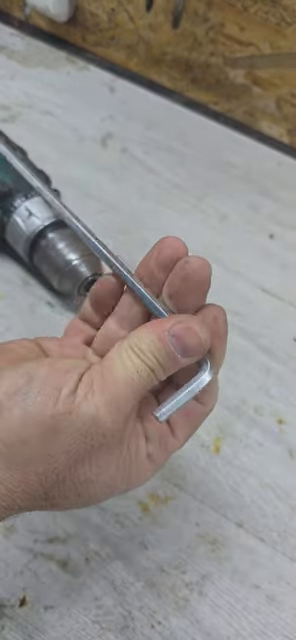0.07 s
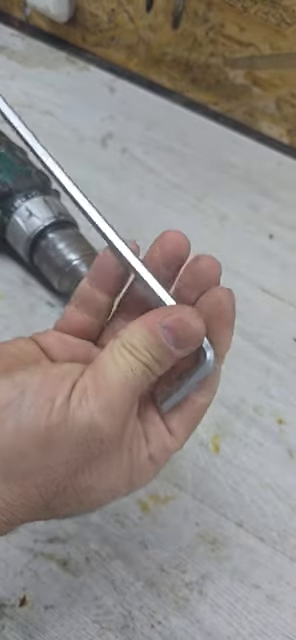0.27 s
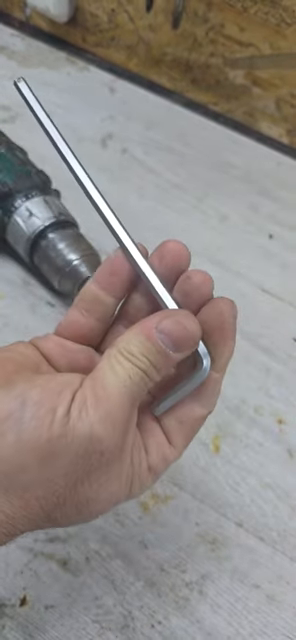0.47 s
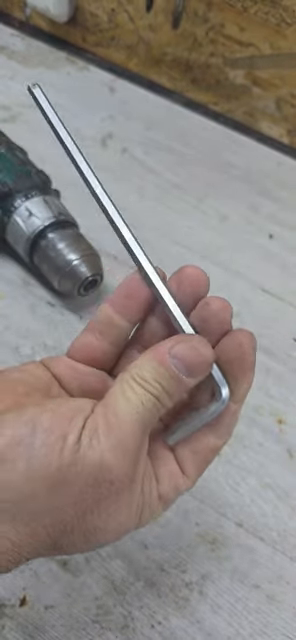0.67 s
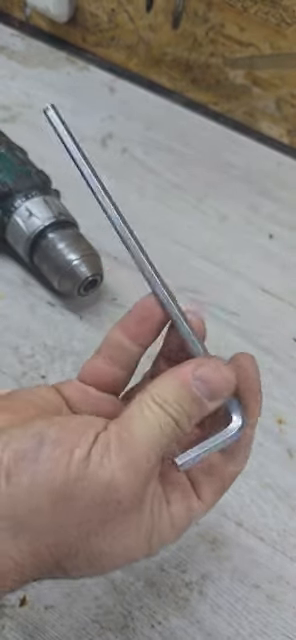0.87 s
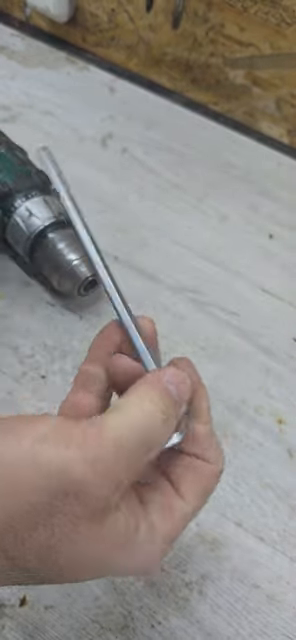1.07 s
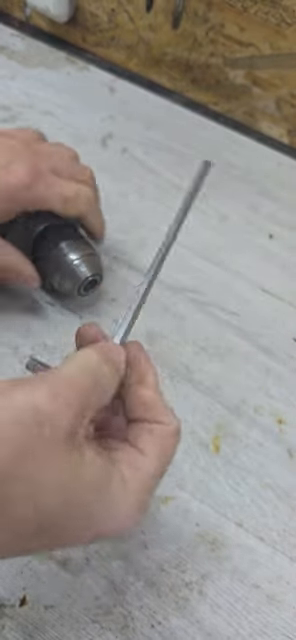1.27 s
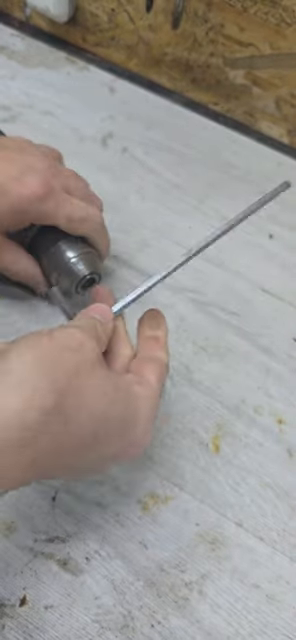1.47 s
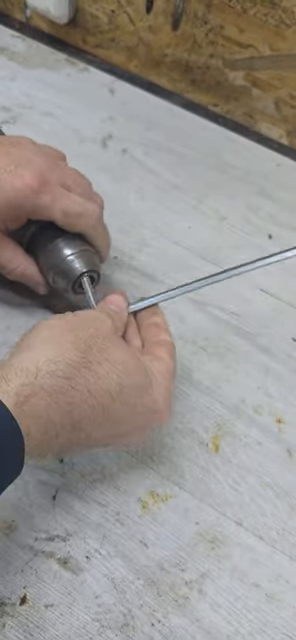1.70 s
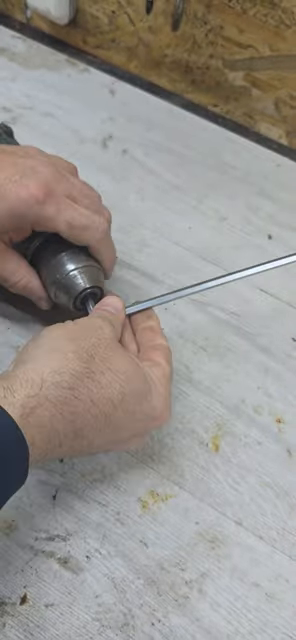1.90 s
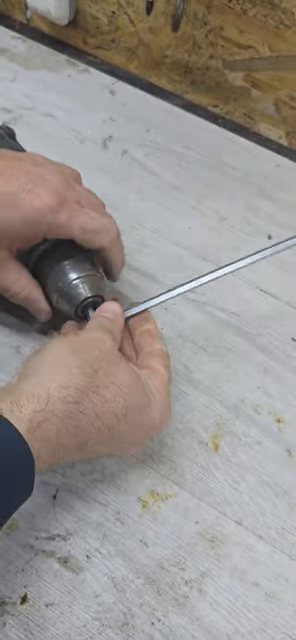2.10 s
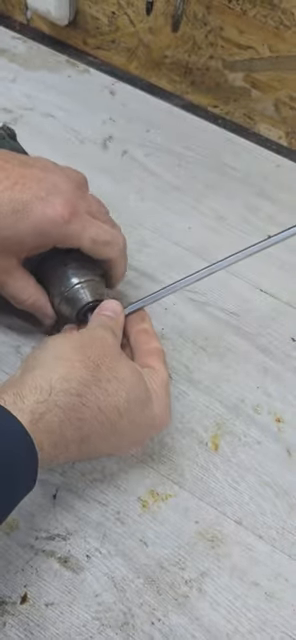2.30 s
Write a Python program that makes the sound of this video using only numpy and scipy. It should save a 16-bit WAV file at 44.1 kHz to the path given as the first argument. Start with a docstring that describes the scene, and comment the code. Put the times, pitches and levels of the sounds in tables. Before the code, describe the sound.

A drill knocks and thumps down on a wooden workbench, then a hex key ticks faintly.

```python
"""A cordless drill is set down on a wooden workbench: its plastic housing knocks, its weight thumps
the top and its loose chuck rattles. A steel hex key chinks and ticks against the chuck.
A hand shifts the drill and a sleeve brushes past, making rubbing noise; there are two short squeaks.
The knocks, thumps and clicks set the parts ringing. Small quiet workshop, close stereo microphone."""
import sys
import numpy as np
from scipy import signal
from scipy.fft import rfft, irfft
from scipy.io import wavfile

SR = 44100
rng = np.random.default_rng(int(sys.argv[2]) if len(sys.argv) > 2 else 0)


def bounce(signal):
    """Save signal as a 16-bit WAV file at the path given by the first command-line argument."""
    frames = np.transpose(np.atleast_2d(signal))
    limited = np.clip(frames, -1, 1)
    pcm = np.round(limited * 32767).astype(np.int16)
    wavfile.write(sys.argv[1], SR, pcm)


N = 108045

# The housing hits the bench (more tilt is brighter): start_s, level_db, tilt_db_per_octave
HOUSING_KNOCKS = [(.2478, -12.5, 0), (.2525, -18, -1), (.2745, -26, -2), (.279, -31, -4.5),
                  (.3757, -26.5, 1), (.4887, -21, -0.5), (.4907, -17, -0.5), (1.4365, -49.5, 2.5),
                  (1.576, -50.5, -1.5), (1.642, -52.5, 6)]
# A knock's colour, or how strong its lows and highs are: frequency_hz, level_db
KNOCK_COLOUR = [(50, -40), (140, -8.5), (520, 1), (1050, -7), (1550, 0), (3000, -4), (4500, -11),
                (7000, -20), (15000, -30.5)]
# The housing's ringing tones (ring_s is the time to fade by 60 dB): pitch_hz, level_db, ring_s
HOUSING_TONES = [(410, -8, .06), (571, -3, .125), (605, -7, .09), (1325, -12, .09), (1500, -6, .075),
                 (1585, -3, .075), (1760, -10, .085), (1935, -14, .14), (2148, -8, .13), (2740, -9, .11),
                 (3050, -11, .1)]
def housing():
    """Hard plastic knocks on wood and rings briefly."""
    knocks = blows(HOUSING_KNOCKS, KNOCK_COLOUR, scatter_db=8.5, scatter_s=.0025)
    ringing = resound(knocks, HOUSING_TONES, ring_db=-15)
    return pan(room(ringing, wall_db=-13.5, room_db=-9, lead_s=.00015), left_db=1)


# The drill's weight lands on the bench top: centre_s, level_db, pitch_hz
BENCH_THUMPS = [(0.2493, -28.5, 192), (0.3645, -19.5, 261), (.45, -3.5, 331), (.465, -16, 148.8),
                (0.4765, -17.5, 330), (0.492, -13, 410), (0.515, -22, 281), (1.388, -43, 126),
                (1.448, -41, 77), (1.536, -37.5, 107.7), (1.647, -48, 79), (1.75, -39, 143),
                (1.926, -43.5, 165.3), (2.048, -46.5, 113.5), (2.095, -55.5, 189.6), (2.336, -54, 368),
                (2.381, -35, 115.4)]
# The top's ringing tones: pitch_hz, level_db, ring_s
BENCH_TONES = [(66, -19.5, .42), (127, -19, .3), (179.6, -24.5, 0.26), (341, -21.5, .22),
               (456, -22.5, 0.13)]
def bench():
    """Each thump is one push and rebound of the top, which then booms. The drill's judder joins in."""
    thumps, t = np.zeros((1, N)), np.arange(N) / SR
    for centre_s, level_db, pitch_hz in BENCH_THUMPS:
        spread = (np.pi * pitch_hz * (t - centre_s)) ** 2
        thumps += amp(level_db) * (1 - 2 * spread) * np.exp(-spread)
    boom = resound(thumps, BENCH_TONES, ring_db=-22)
    return pan(room(boom, wall_db=-17.5, room_db=-7.5, lead_s=0) + judder(), left_db=-1.5)


def judder(start_s=.455, pitch_hz=68.1, level_db=-21, ring_s=.49, count=6):
    """The landed drill rocks quickly on its feet; higher multiples of the pitch die first."""
    t = np.maximum(np.arange(N) / SR - start_s, 0)
    multiple, phase = np.arange(1, count + 1)[:, None], rng.random((count, 1))
    fade = amp(-60 * t * multiple ** .38 / ring_s)
    tones = fade * np.sin(2 * np.pi * (multiple * pitch_hz * t + phase))
    rise = 1 - np.exp(-t / .0084)
    return amp(level_db) * rise * tones.sum(0) / np.sqrt(2)


# The loose chuck clacks: start_s, level_db, tilt_db_per_octave
CHUCK_RATTLES = [(.338, -29, 0.5), (.359, -37, -1), (.3765, -38.5, 6.5), (.452, -16.5, -1), (.458, -23, -4),
                 (.502, -30.5, -3), (.5135, -33, 1), (.5318, -25.5, 0.5), (.565, -35.5, 1)]
# A clack's colour: frequency_hz, level_db
RATTLE_COLOUR = [(200, -9.5), (1200, -3.5), (2500, -12.5), (3600, -4), (6000, -5), (8000, -5.5),
                 (9700, -8.5), (12000, -4.5), (16000, -9)]
# The chuck's ringing tones: pitch_hz, level_db
CHUCK_TONES = [(3382, -11), (3533, -11), (3740, -12), (4050, -14), (5216, -11), (7430, -10), (7900, -7),
               (9350, -11), (13700, -10)]
# Faint tones that linger in the steel: pitch_hz, level_db, ring_s
SINGING_TONES = [(3569, 0, .65), (15600, 13, .33)]
def chuck(rebounds=15, clatter_start_s=.455, clatter_length_s=.085, ring_cycles=400):
    """The loose steel chuck clacks as the drill lands, with a fading clatter of small rebounds."""
    places = (np.arange(rebounds) + rng.random(rebounds)) / rebounds
    starts_s = clatter_start_s + clatter_length_s * places
    levels_db = -30.5 - 4.5 * places + 2 * rng.standard_normal(rebounds)
    clatter = [(start_s, level_db, -1) for start_s, level_db in zip(starts_s, levels_db)]
    clacks = blows(CHUCK_RATTLES + clatter, RATTLE_COLOUR, scatter_db=8, scatter_s=.0038)
    tones = [(hz, db, ring_cycles / hz) for hz, db in CHUCK_TONES]
    ringing = resound(clacks, tones, ring_db=-8)
    add(ringing, .4907, amp(-51) * ring(SINGING_TONES))  # the jolt leaves the steel singing
    return pan(room(ringing, wall_db=-19.5, room_db=-7, lead_s=0), left_db=5)


# Dry ticks of steel on steel: start_s, level_db, tilt_db_per_octave
KEY_TICKS = [(.0197, -42.5, 0.5), (.0377, -40, 2.5), (1.756, -46.5, -4.5), (1.7975, -41, 4.5),
             (1.8575, -44, 1.5), (1.9655, -51, -0.5), (2.304, -57.5, 1.5), (2.3347, -50.5, 2.5)]
# A tick's colour: frequency_hz, level_db
TICK_COLOUR = [(200, -26), (450, -14.5), (1000, -19), (2500, -8.5), (3200, 1), (5200, 0), (8500, -10.5),
               (15000, -15.5)]
# The key strikes the chuck's jaws: start_s, level_db, tilt_db_per_octave
KEY_CHINKS = [(1.756, -50.5, -10), (1.771, -54, 0), (1.7975, -32.5, -1), (1.838, -74, 5),
              (1.848, -52, -8.5)]
def hex_key():
    """The key taps the jaws: ticks are mostly click, chinks are all ring."""
    ticks = blows(KEY_TICKS, TICK_COLOUR, scatter_db=11.5, scatter_s=.0029)
    ticks = ticks + amp(-12) * convolve(ticks, unit(jaws()))
    chinks = np.zeros((1, N))
    for start_s, level_db, tilt_db in KEY_CHINKS:
        add(chinks, start_s, amp(level_db) * jaws(tilt_db))
    chinks = room(pan(chinks, left_db=11.5), wall_db=-7.5, room_db=-12, lead_s=.00025)
    return pan(room(ticks, wall_db=-8.5, room_db=-7, lead_s=.0002), left_db=3) + chinks


# The jaws' ringing tones: pitch_hz, level_db
JAW_TONES = [(1280, -25), (3020, -17), (4800, -16), (5330, -16), (7100, -14), (7588, 2), (10280, -13),
             (10870, -10), (13240, -14), (13990, -13)]
def jaws(tilt_db=0, ring_s=.047):
    """The jaws ring briefly, damped by the fingers; tilt_db makes a chink duller or brighter."""
    return ring([(hz, db + tilt_db * np.log2(hz / 7500), ring_s) for hz, db in JAW_TONES])


# The drill's foot groans, a finger squeaks on the key: start_s, length_s, level_db, start_hz, end_hz
SQUEAKS = [(.528, 0.0478, -33.5, 496, 276), (0.876, 0.043, -62.5, 2920, 2890)]
def squeaks(waver_share=.055, wobbles=50):
    """Surfaces stick and slip for a moment: an unsteady tone that falls as the slide slows."""
    out = np.zeros((1, N))
    for start_s, length_s, level_db, start_hz, end_hz in SQUEAKS:
        progress = np.linspace(0, 1, round(length_s * SR))
        waver = np.interp(progress, np.linspace(0, 1, wobbles), rng.standard_normal(wobbles))
        pitch_hz = start_hz * (end_hz / start_hz) ** progress * (1 + waver_share * waver)
        tone = np.sin(2 * np.pi * np.cumsum(pitch_hz) / SR)
        add(out, start_s, amp(level_db) * np.sin(np.pi * progress) * tone)
    return out


# How loud each rubbing sound is over time: time_s, level_db
SLEEVE_LEVELS = [(0, -54.5), (.12, -56.5), (.65, -71.5), (.82, -65.5), (.9, -62.5), (1.05, -60),
                 (1.349, -64), (1.441, -57.5), (1.56, -59.5), (1.7, -63.5), (1.9, -69.5), (2.02, -80),
                 (2.2, -86.5), (2.362, -65), (2.45, -69)]
SLIDE_LEVELS = [(0.851, -85), (1.02, -58.5), (1.3, -81), (1.49, -63), (1.75, -89)]
SCRAPE_LEVELS = [(0, -70), (.24, -50), (.55, -46.5), (.7, -79.5), (1.349, -68.5), (1.44, -63), (1.62, -57),
                 (1.7, -70.5), (1.861, -60.5), (2.019, -73), (2.45, -99.5)]
RUMBLE_LEVELS = [(0.171, -87.5), (.25, -55.5), (0.898, -67), (.96, -89), (1.37, -89.5), (1.4, -61),
                 (1.6, -61), (1.72, -49.5), (1.82, -49.5), (1.898, -47), (1.969, -63.5), (2.029, -69.5),
                 (2.2, -100)]
# The colour of each: frequency_hz, level_db
SLEEVE_COLOUR = [(100, -39.5), (270, -2), (560, -2.5), (2000, -7.5), (6000, -9), (14000, -11)]
SLIDE_COLOUR = [(3000, -28.5), (11000, 0)]
SCRAPE_COLOUR = [(130, -46.5), (350, 3.5), (650, -1.5), (1500, -5), (3500, -15), (7000, -22), (15000, -41)]
RUMBLE_COLOUR = [(65, -33.5), (115, 6), (220, 3), (380, -7.5), (620, -29), (2000, -58.5)]
def handling():
    """The sleeve brushes, the key slides through fingers, the drill scrapes and rumbles on the top."""
    sleeve = grainy_noise(SLEEVE_COLOUR, SLEEVE_LEVELS, grain_db=0, grain_s=.002)
    slide = grainy_noise(SLIDE_COLOUR, SLIDE_LEVELS, grain_db=3, grain_s=.0046)
    scrape = grainy_noise(SCRAPE_COLOUR, SCRAPE_LEVELS, grain_db=3, grain_s=.0043)
    rumble = grainy_noise(RUMBLE_COLOUR, RUMBLE_LEVELS, grain_db=2, grain_s=.0073)
    return pan(sleeve + slide, left_db=2.5) + scrape + rumble


# The background's colour: frequency_hz, level_db
HUSH_COLOUR = [(90, -16.5), (380, -6), (800, -21), (6500, -34.5), (15000, -29)]
def hush(level_db=-78):
    """Very faint background noise whose level flickers."""
    return grainy_noise(HUSH_COLOUR, [(0, level_db)], grain_db=-4, grain_s=.012)


# How long the room's echo takes to fade by 60 dB: frequency_hz, ring_s
ROOM_FADE = [(60, 0.088), (170, 0.44), (400, 0.25), (800, .19), (4000, .2), (15000, 0.13)]
def room(sound, wall_db, room_db, lead_s, wall_s=.0049, rise_s=.0016, size=32768):
    """The direct sound (lead_s earlier on the left), a bounce off the nearest wall and a fading echo."""
    hz, t, bands = signal.stft(diffuse(size), SR, nperseg=256)
    fade = amp(-60 * t / read(ROOM_FADE, hz)[:, None])
    tail = signal.istft(bands * fade, SR, nperseg=256)[1]
    rise = 1 - np.exp(-np.arange(tail.shape[1]) / SR / rise_s)
    response = amp(room_db) * unit(tail * rise)
    response[[0, 1], [0, round(lead_s * SR)]] += 1
    response[:, round(wall_s * SR)] += amp(wall_db)
    return convolve(sound, response)


# How alike left and right are: frequency_hz, likeness_0_to_1
STEREO_LIKENESS = [(60, 0.86), (250, 0.96), (600, 0.23), (1200, 0.12), (4000, 0.023)]
def diffuse(size):
    """Stereo white noise, alike in the bass and unrelated in the treble."""
    a, b = rfft(rng.standard_normal((2, size)))
    same = np.clip(read(STEREO_LIKENESS, np.fft.rfftfreq(size, 1 / SR)), 0, 1)
    mid, side = a * np.sqrt((1 + same) / 2), b * np.sqrt((1 - same) / 2)
    return irfft(np.array([mid + side, mid - side]), size)


def blows(rows, colour, scatter_db, scatter_s, size=4096):
    """Each contact is a sharp pulse followed by a quick scatter of vibration in the part."""
    out, t = np.zeros((2, N)), np.arange(size) / SR
    for start_s, level_db, tilt_db in rows:
        hit = amp(scatter_db) * unit(diffuse(size) * np.exp(-t / scatter_s))
        hit[:, 0] += 1
        coloured = unit(convolve(hit, pulse(colour, tilt_db)))
        add(out, start_s, amp(level_db) * np.sqrt(.005 * SR) * coloured)
    return out


def pulse(colour, tilt_db, size=2048):
    """A click of the given colour, tilted brighter or duller around 2 kHz."""
    hz = abs(np.fft.fftfreq(size, 1 / SR))
    octaves = np.log2((hz + 100) / 2000)
    log_gain = np.log(amp(read(colour, hz) + tilt_db * octaves))
    spectrum = np.exp(np.conj(signal.hilbert(log_gain)))  # packs the energy at the start
    return unit(np.fft.ifft(spectrum).real[:size // 2])


def ring(tones, size=32768):
    """The fading tones of one struck object."""
    t = np.arange(size) / SR
    return sum(amp(db - 60 * t / ring_s) * np.sin(2 * np.pi * hz * t) for hz, db, ring_s in tones)


def resound(blow, tones, ring_db):
    """A blow together with the tones that it sets ringing."""
    return blow + amp(ring_db) * convolve(blow, unit(ring(tones)))


def grainy_noise(colour, levels, grain_db, grain_s):
    """Coloured noise that follows a level curve, roughened by quick random swells."""
    gains = amp(read(colour, np.fft.rfftfreq(N, 1 / SR)))
    noise = unit(irfft(rfft(diffuse(N)) * gains, N)) * np.sqrt(N)
    t = np.arange(N) / SR
    grains = np.interp(t / grain_s, np.arange(N), rng.standard_normal(N))
    return noise * amp(np.interp(t, *np.transpose(levels)) + grain_db * grains)


def amp(db):
    return 10 ** (np.asarray(db) / 20)


def read(points, hz):
    """Reads between a table's rows, with frequency spaced by octaves."""
    row_hz, value = np.transpose(points)
    return np.interp(np.log(hz + 1), np.log(row_hz + 1), value)


def unit(x):
    """Scales to an average energy of 1 per channel."""
    return x / np.sqrt((np.atleast_2d(x) ** 2).sum(-1).mean() + 1e-30)


def add(mix, start_s, sound):
    part = mix[:, round(start_s * SR):][:, :sound.shape[-1]]
    part += sound[..., :part.shape[1]]


def convolve(x, response):
    return signal.fftconvolve(np.atleast_2d(x), np.atleast_2d(response), axes=1)[:, :N]


def pan(x, left_db):
    return x * amp([[left_db / 2], [-left_db / 2]])


def scene():
    background = hush()
    return housing() + bench() + chuck() + hex_key() + handling() + squeaks() + background


def record(dry):
    """The microphone sheds deep bass, peaks are rounded off and the highest treble is cut."""
    thin = signal.sosfilt(signal.butter(4, 38, "highpass", fs=SR, output="sos"), dry)
    treble_cut = signal.firwin(401, 15850, window=("kaiser", 8), fs=SR)
    return signal.oaconvolve(np.tanh(thin), treble_cut[None], "same")


dry = scene()
out = record(dry)
bounce(out)
```